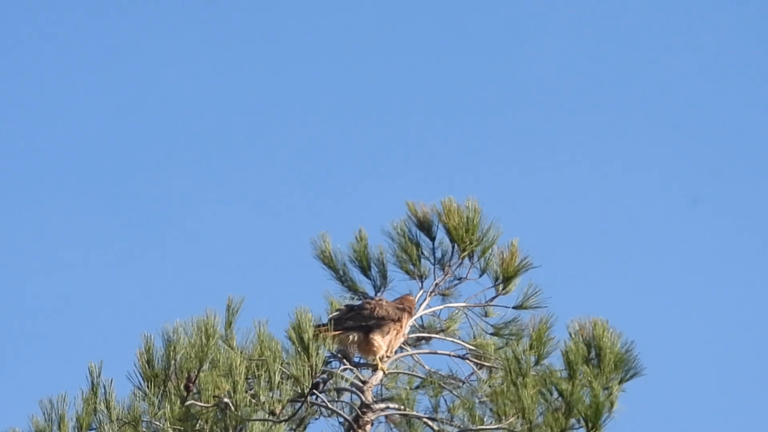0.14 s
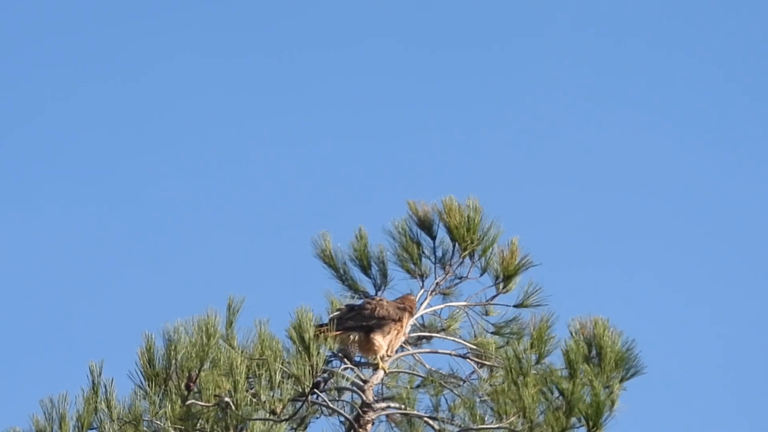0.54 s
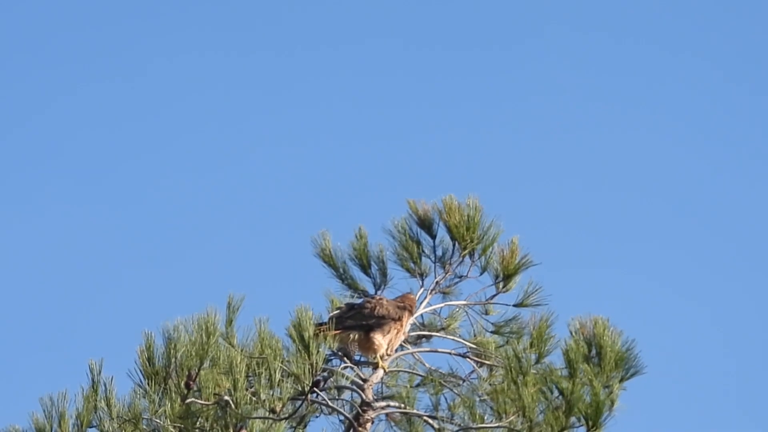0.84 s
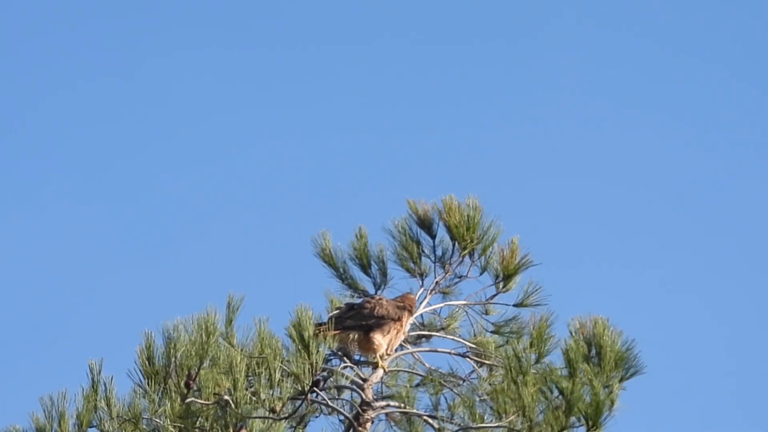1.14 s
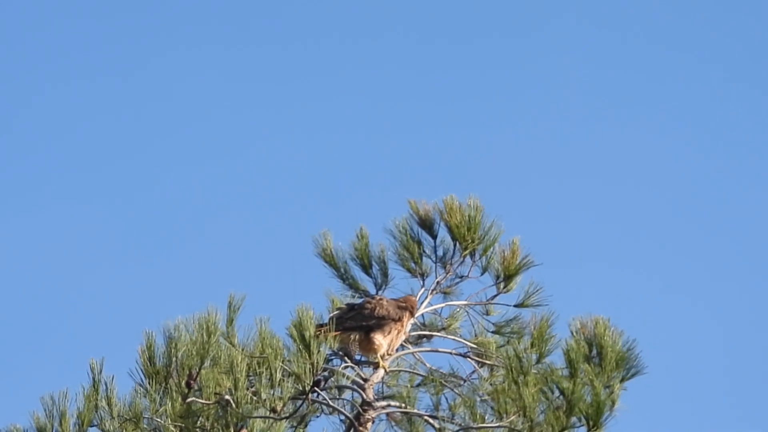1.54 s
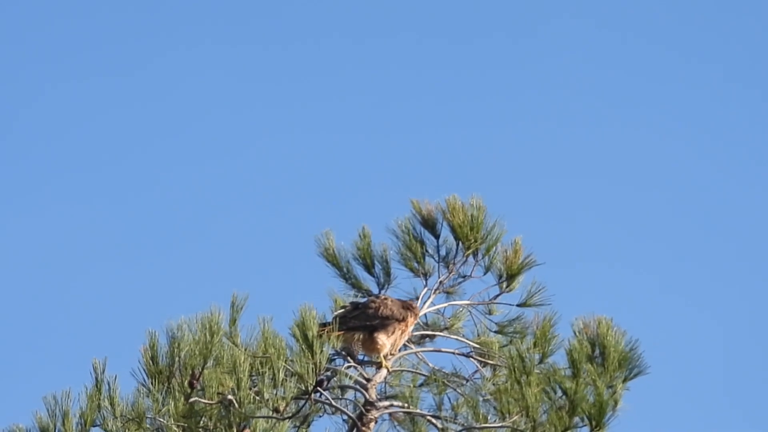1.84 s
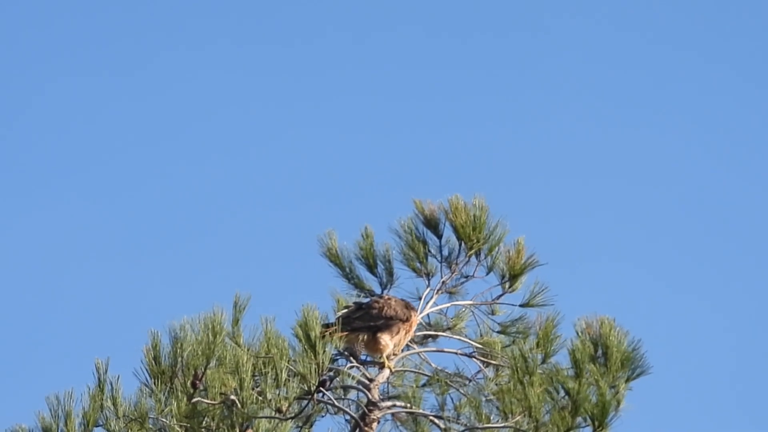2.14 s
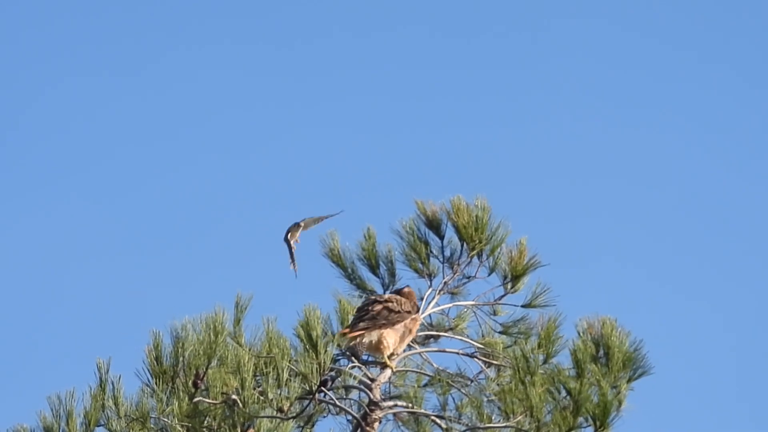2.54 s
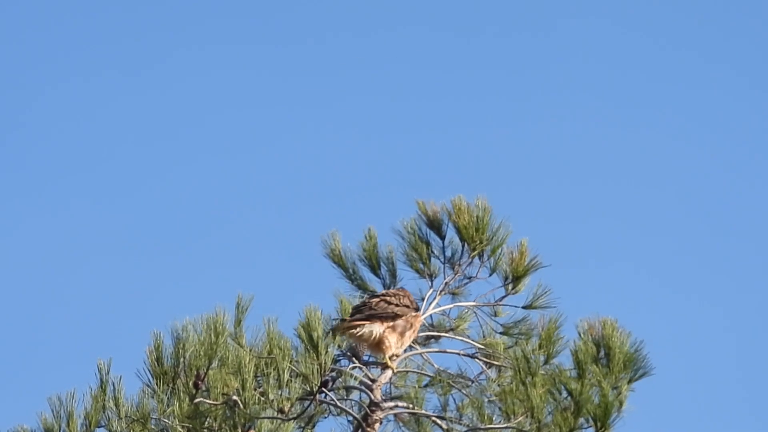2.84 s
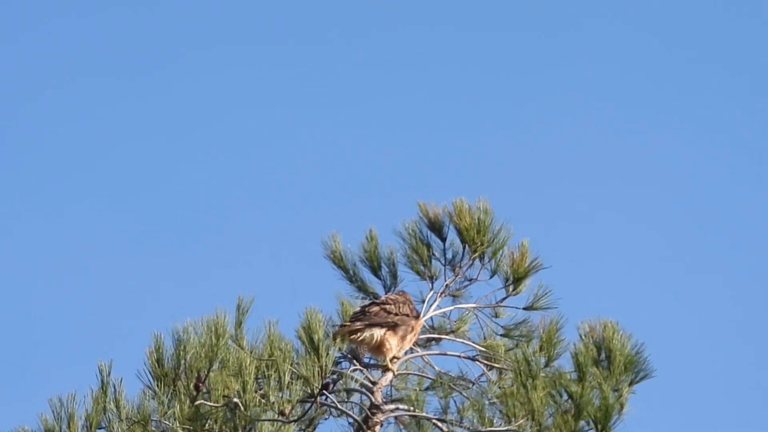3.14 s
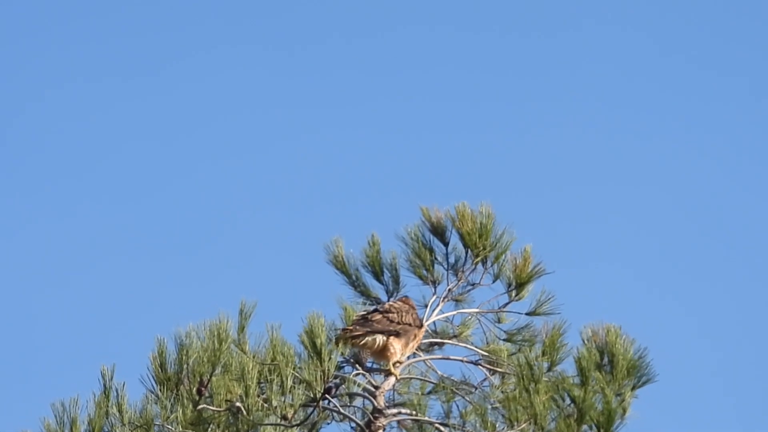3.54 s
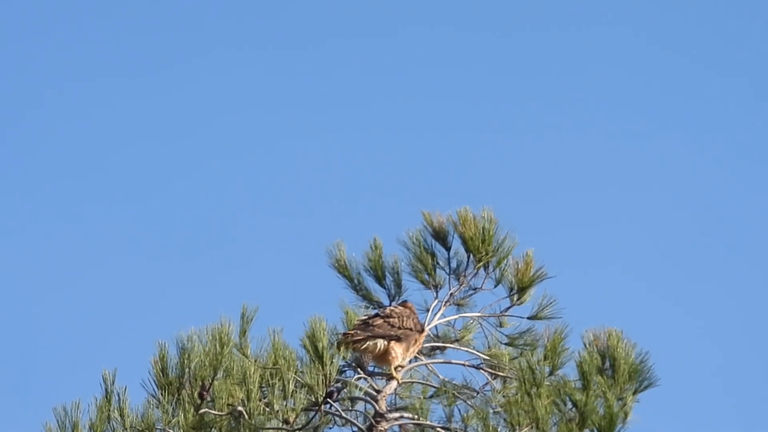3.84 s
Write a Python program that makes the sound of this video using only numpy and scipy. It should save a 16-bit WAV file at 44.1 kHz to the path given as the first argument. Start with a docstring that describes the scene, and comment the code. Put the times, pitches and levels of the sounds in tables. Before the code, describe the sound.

Small falcon gives seven rapid shrill calls over low wind and distant traffic rumble outdoors.

```python
"""Open air by trees: a small falcon gives seven shrill calls over wind and the drone of far traffic.
Its voice is a sum of partials on drawn pitch and level curves, with hoarse breaks with a quick beating.
Before it, other small birds chirp further off, one gives a long rising rasp, and twigs tick:
more partials, torn hiss and dying noise. Trees return a thin echo, a blurred noise tail;
wind and traffic are banded noise with wavering engine tones."""
import sys
import numpy as np
from scipy import signal
from scipy.fft import rfft, irfft
from scipy.io import wavfile
from scipy.ndimage import uniform_filter1d

SR = 44100
rng = np.random.default_rng(int(sys.argv[2]) if len(sys.argv) > 2 else 0)


def materialize(psi):
    """Save the field psi as 16-bit PCM at rate SR to the path in sys.argv[1].

    A 1-D psi becomes a single channel; in a 2-D psi each row is a channel.
    """
    bounded = np.clip(np.atleast_2d(psi).T, -1, 1)
    quanta = np.round(bounded * 32767).astype(np.int16)
    wavfile.write(sys.argv[1], SR, quanta)


N = 176400


def falcon():
    """The 2nd partial leads, the throat sets the others; around a break the level beats quickly."""
    # one table per call, an arched note, mostly then a dip and a jump to a high note:
    # (time [s], pitch [Hz], level of 2nd partial [dB])
    calls = [
        [(2.882, 2240, -29), (2.886, 2330, -21), (2.899, 2490, -17), (2.914, 2470, -14), (2.935, 2250, -28),
         (2.951, 2510, -15), (2.955, 2870, -14), (2.988, 2790, -18.5), (2.992, 2400, -22.5), (2.996, 2150, -22)],
        [(3.062, 2280, -23), (3.067, 2370, -25), (3.075, 2520, -13), (3.078, 2870, -19), (3.092, 2850, -15.5),
         (3.096, 2490, -17.5), (3.114, 2250, -30), (3.125, 2500, -15), (3.129, 2830, -18.5),
         (3.151, 2880, -14.5), (3.164, 2780, -24), (3.168, 2370, -20), (3.172, 2150, -32)],
        [(3.24, 2250, -35), (3.245, 2390, -23), (3.256, 2540, -16.5), (3.265, 2520, -16.5), (3.277, 2300, -27),
         (3.303, 2560, -18.5), (3.307, 2860, -16), (3.335, 2840, -17), (3.339, 2450, -21.5), (3.344, 2150, -22)],
        [(3.419, 2190, -42), (3.424, 2280, -21.5), (3.431, 2390, -21.5), (3.447, 2390, -24.5),
         (3.456, 2250, -28), (3.466, 2310, -22.5), (3.479, 2540, -15), (3.482, 2820, -18), (3.503, 2840, -16.5),
         (3.508, 2400, -20.5), (3.514, 2150, -27)],
        [(3.59, 2200, -27), (3.594, 2290, -22.5), (3.603, 2370, -19.5), (3.618, 2350, -21.5),
         (3.632, 2200, -29), (3.648, 2500, -17.5), (3.652, 2820, -15), (3.675, 2820, -17.5),
         (3.679, 2400, -18.5), (3.684, 2150, -21)],
        [(3.757, 2160, -56), (3.761, 2250, -23.5), (3.772, 2370, -18), (3.784, 2360, -19.5),
         (3.804, 2120, -23.5), (3.814, 2450, -17), (3.823, 3175, -21), (3.831, 2870, -15.5),
         (3.843, 2820, -22.5), (3.847, 2380, -14), (3.853, 2150, -37)],
        [(3.939, 2180, -28), (3.943, 2250, -22), (3.958, 2340, -18), (3.974, 2200, -22.5), (3.982, 2310, -31),
         (4.01, 2710, -7.5)],
    ]
    # dips to a lower, hoarse register that sags and springs back:
    # (time [s], length [s], rim pitch [Hz], lowest pitch [Hz], level [dB])
    breaks = [(2.924, 0.027, 1926, 1670, -32), (3.276, 0.024, 1760, 1562, -32),
              (3.455, 0.0262, 1737, 1504, -30.5), (3.62, 0.028, 1830, 1525, -28),
              (3.977, 0.0203, 1920, 1575, -27.5)]
    # partials of the hoarse register: (multiple of pitch, level [dB])
    break_partials = [(2, -7), (3, 1.5), (4, 2.5)]
    # half-pitch catches at the start of some calls:
    # (time [s], length [s], start pitch [Hz], end pitch [Hz], level [dB])
    catches = [(3.063, 0.012, 1160, 1200, -41), (3.241, 0.013, 1210, 1224, -34.5),
               (3.42, 0.0054, 1130, 1200, -35.5)]
    # partials of a catch: (multiple of pitch, level [dB])
    catch_partials = [(3, -6), (5, 8)]
    call_rough, call_breath_db, break_rough = .09, -56, .12
    beat_hz, beat_lead_s, beat_depth = 176, 0.0061, .8

    out, t = np.zeros((2, N)), np.arange(N) / SR
    call_partials = [(1, None), (2, 0), (3, None), (4, None), (5, None)]  # None: set by the throat
    for call in calls:
        add_voice(out, call, call_partials, call_rough, 250, call_breath_db)
    for start, length, *_ in breaks:
        since = t - start + beat_lead_s
        whole_beats_s = round(length * beat_hz) / beat_hz
        beating = (since > 0) * (since < whole_beats_s)
        dip = np.sin(np.pi * beat_hz * since) ** 2 * beating
        out = out * (1 - beat_depth * dip)
    for row in breaks:
        add_voice(out, scoop(row), break_partials, break_rough, 300)
    for row in catches:
        add_voice(out, swell(row), catch_partials, break_rough, 300)
    return out


def scoop(row):
    """A short sag in pitch that springs back."""
    start, length, rim, low, db = row
    return [(start, rim, db - 14),
            (start + .35 * length, low * 1.03, db - 2),
            (start + .7 * length, low, db),
            (start + length, rim * 1.08, db - 4)]


def swell(row):
    """A short glide that swells and fades."""
    start, length, hz0, hz1, db = row
    return [(start, hz0, db - 12),
            (start + .4 * length, .7 * hz0 + .3 * hz1, db),
            (start + length, hz1, db - 8)]


def small_birds():
    """Chirps are gliding partials; the rasp is overlapping hoarse strands with torn hiss."""
    # far chirps, one table each: (time [s], pitch [Hz], level [dB])
    chirps = [
        [(0.42, 3410, -69), (0.446, 3980, -53), (0.47, 4330, -54.5)],
        [(0.462, 3650, -52), (0.48, 3280, -44), (0.497, 2590, -52)],
        [(0.478, 3390, -48), (0.497, 3760, -39.5), (0.505, 4380, -40), (0.515, 4030, -34.5), (0.532, 3850, -39)],
        [(0.892, 3150, -77), (0.909, 3600, -55), (0.922, 3980, -49), (0.944, 3800, -45.5), (0.955, 4440, -54),
         (0.965, 4460, -68)],
        [(1.275, 2430, -49), (1.288, 2950, -45), (1.3, 3850, -56)],
        [(1.5, 3700, -48), (1.535, 3554, -39), (1.56, 3540, -49)],
        [(1.545, 3810, -26.5), (1.552, 4670, -36.5), (1.562, 4670, -44)],
        [(1.8, 3430, -71), (1.821, 3920, -55.5), (1.85, 5150, -61)],
        [(1.84, 2990, -61), (1.89, 3305, -50)],
        [(2.016, 5440, -61), (2.05, 4680, -67)],
    ]
    # partials of the far chirps: (multiple of pitch, level [dB])
    chirp_partials = [(1, 2.5), (2, -33.5)]
    # one nearer, brighter chirp, two voices at its start: (time [s], pitch [Hz], level [dB])
    near_chirp = [
        [(2.394, 2370, -54), (2.404, 2650, -44), (2.416, 2843, -32), (2.421, 3330, -34.5), (2.428, 3450, -26.5),
         (2.438, 3780, -32.5), (2.46, 4360, -47)],
        [(2.396, 3130, -49), (2.408, 3284, -41), (2.424, 3800, -29.5)],
    ]
    # partials of the nearer chirp: (multiple of pitch, level [dB])
    near_partials = [(1, 2.5), (2, -17.5), (3, -35)]
    # three torn strands of the rasp: (time [s], pitch [Hz], level [dB])
    rasp = [
        [(1.295, 2518, -45), (1.33, 2600, -41), (1.362, 2810, -40), (1.385, 2750, -45)],
        [(1.325, 1745, -54), (1.365, 1971, -42.5), (1.41, 2196, -36), (1.46, 2360, -41), (1.5, 2530, -39)],
        [(1.485, 2847, -44), (1.52, 2910, -34.5), (1.545, 2892, -40.5), (1.575, 2880, -50)],
    ]
    # partials of each strand: (multiple of pitch, level [dB])
    rasp_partials = [
        [(1, -0.5), (3, -4)],
        [(1, -14), (2, 2.5), (3, -6.5), (4, -14)],
        [(1, -5.5), (2, 3), (3, -18)],
    ]
    # relative spectrum of the rasp's hiss: (frequency [Hz], density [dB per Hz])
    rasp_hiss = [(1800, -18.5), (2300, -7.5), (4500, -2.5), (5130, -7.5), (8510, -6), (14500, -71)]
    # course of the hiss: (time [s], level [dB])
    rasp_air = [(1.245, -53), (1.3, -32.5), (1.41, -33.5), (1.465, -41), (1.53, -32), (1.6, -58)]

    out = np.zeros((2, N))
    for chirp in chirps:
        add_voice(out, chirp, chirp_partials, rough=.45, rough_hz=200, breath_db=-22)
    for chirp, partials in zip(near_chirp, [near_partials, near_partials[:1]]):
        add_voice(out, chirp, partials, rough=.2, rough_hz=200, breath_db=-36)
    for strand, partials in zip(rasp, rasp_partials):
        add_voice(out, strand, partials, rough=.55, rough_hz=300)
    s, db = np.transpose(rasp_air)
    level = np.interp(np.arange(N) / SR, s, db, left=-120, right=-120)
    hiss_gain = amp(level + drift(90, N))  # 1 dB of quick flicker
    return out + hiss_gain * banded_noise(rasp_hiss, patchy_db=5)


def ticks():
    """A short crack inside a brief, brighter rustle of needles: two dying bursts of noise."""
    # twig snaps: (time [s], level before the band filter [dB], lowest frequency [Hz])
    snaps = [(0.295, -34, 2200), (1.662, -39, 4500)]
    crack_t60_s, crack_top_hz = .03, 6000
    rustle_t60_s, rustle_db, rustle_rise_s, rustle_top_hz = .25, -12, .025, 9000

    out, t = np.zeros(N), np.arange(SR // 5) / SR
    for s, db, low_hz in snaps:
        crack, rustle = rng.standard_normal((2, len(t)))
        # the crack falls where the rustle has fully risen
        crack = crack * amp(-60 * (t - rustle_rise_s) / crack_t60_s) * (t > rustle_rise_s)
        rustle_rise = np.minimum(t / rustle_rise_s, 1) ** 2
        rustle = rustle * amp(rustle_db - 60 * t / rustle_t60_s) * rustle_rise
        i = int((s - rustle_rise_s) * SR)
        for part, top_hz in [(crack, crack_top_hz), (rustle, rustle_top_hz)]:
            band = signal.butter(3, [low_hz, top_hz], "band", fs=SR, output="sos")
            out[i:i + len(t)] += amp(db) * signal.sosfilt(band, part)
    return out


def trees(x):
    """Diffuse dying echoes, unlike left and right, with a rough, blurred level."""
    t60_s, start_s, cut_hz = .6, 0.0086, 6500
    near_t60_s, near_db = 0.2, 12  # the nearest branches answer first and loudest
    blur, blur_hz = .6, 120  # roughness of the echo's level

    t = np.arange(SR) / SR
    decay = amp(-60 * t / t60_s) + amp(near_db - 60 * t / near_t60_s)
    tail = rng.standard_normal((2, SR)) * decay * (t > start_s)
    tail = signal.sosfilt(signal.butter(1, cut_hz, fs=SR, output="sos"), tail)
    tail = tail / np.sqrt(np.sum(tail ** 2, axis=1, keepdims=True))
    echo = signal.fftconvolve(x.mean(0)[None], tail, axes=1)[:, :N]
    return echo * (1 + blur * np.array([drift(blur_hz, N), drift(blur_hz, N)]))


def traffic_and_wind():
    """Broad noise on a slow level, with wavering engine tones."""
    # relative spectrum of wind and traffic: (frequency [Hz], density [dB per Hz])
    wind = [(30, -69), (91, -31), (114, -16.5), (201, -6.5), (247, -10.5), (328, -3), (548, -9), (709, -4),
            (1610, -11.5), (2560, -27.5), (4880, -25), (14000, -62)]
    # slow course of the noise: (time [s], level [dB])
    gust = [(0.0, -43.5), (2.56, -42), (4.0, -46)]
    # far engines, one table each: (time [s], frequency before the 0.99 multiple below [Hz], level [dB])
    drones = [
        [(0, 697.6, -51.5), (0.45, 691, -60.5)],
        [(1.7, 310, -62), (2.2, 318, -49), (2.8, 310, -55), (3.4, 314, -51.5), (4, 316, -50)],
    ]

    s, db = np.transpose(gust)
    noise = amp(np.interp(np.arange(N) / SR, s, db)) * banded_noise(wind, patchy_db=3.0)
    tones = np.zeros((2, N))
    for tone in drones:
        add_voice(tones, tone, [(0.99, 0.029)], rough=0.72, rough_hz=8.0)
    return noise + tones.mean(0)  # the engines sit in the middle


def add_voice(out, rows, partials, rough, rough_hz, breath_db=-60):
    """Partials on a pitch and level curve, roughened by random flutter and by breath noise."""
    # throat colour against the 2nd partial, at full effort: (frequency [Hz], level [dB])
    throat = [(2300, -15.5), (2900, -19.5), (7000, -7.5), (7600, -14), (8600, -18.5), (9500, -11),
              (10300, -31.5), (11400, -36.5), (14500, -69)]
    # side of the voice: (frequency [Hz], left minus right [dB])
    voice_pan = [(2500, 5.5), (4800, -1), (5700, -0.5), (9000, 1.5)]
    left_lead_s = 2.4e-5
    bright_per_db, full_db = .9, -14  # throat-set partials fade further when the effort drops
    glide_loss_db = .12  # they also fade on fast glides, except the 2nd [dB per Hz/ms]

    s, hz, db = np.transpose(rows)
    i = np.arange(int(s[0] * SR), min(int(s[-1] * SR), N))
    pitch = np.interp(i / SR, s, hz)
    level = np.interp(i / SR, s, db) + 3  # rms to peak of a sine
    turn = 2 * np.pi * np.cumsum(pitch) / SR + rough * drift(rough_hz, len(i))
    fade = np.clip(np.minimum(i - i[0], s[-1] * SR - i) / 60, 0, 1)  # 60 samples at each end
    flutter = 1 + rough * drift(rough_hz, len(i))
    breath = amp(breath_db) * drift(1200, len(i))
    glide = uniform_filter1d(np.abs(np.gradient(pitch)) * SR / 1000, size=200)  # Hz/ms
    sides = np.array([[.5], [-.5]])
    for k, k_db in partials:
        if k_db is None:
            effort_db = bright_per_db * (level - full_db)
            k_db = at_hz(throat, k * pitch) + effort_db - glide_loss_db * glide * (k != 2)
        pan = at_hz(voice_pan, k * pitch) * sides
        lead = 2 * np.pi * k * pitch * left_lead_s * sides
        wave = np.sin(k * turn + lead + rng.uniform(0, 2 * np.pi))
        rough_gain = flutter + breath * k ** 4  # breath blurs the higher partials most
        out[:, i] += amp(level + k_db + pan) * fade * rough_gain * wave


def banded_noise(spectrum, patchy_db):
    """Third-octave bands of stereo noise, each with its own level, flicker, likeness and side; rms 1."""
    # likeness of left and right: (frequency [Hz], correlation [-1 to 1])
    likeness = [(60, 0.99), (150, 0.99), (370, 0.89), (930, 0.87), (2310, 0.56), (5770, -0.19)]
    # side of the noise: (frequency [Hz], left minus right [dB])
    noise_pan = [(300, 0.5), (900, -2), (2500, 0.5)]

    out, edges = 0, 28 * 2 ** (np.arange(28) / 3)
    white = rng.standard_normal((2, 2, N))
    for k, (low, high) in enumerate(zip(edges, edges[1:])):
        band = signal.butter(3, [low, high], "band", fs=SR, output="sos")
        mid, side = signal.sosfilt(band, white[k % 2])  # neighbouring bands use different noise
        hz = np.sqrt(low * high)
        alike = np.clip(at_hz(likeness, hz), -1, 1)
        slow = np.repeat(drift(150, N // 40 + 1), 40)[:N]  # held 40 samples: a 3.75 Hz flicker
        pan = at_hz(noise_pan, hz) * np.array([[.5], [-.5]])
        gain = amp(at_hz(spectrum, hz) + patchy_db * slow + pan)
        out = out + gain * (np.sqrt(1 + alike) * mid + np.sqrt(1 - alike) * side * [[1], [-1]])
    return rms_one(out)


def drift(rate, size):
    """Smooth random wander of rms 1: white noise through two equal low-pass poles at rate [Hz]."""
    r = np.exp(-2 * np.pi * rate / SR)
    run = SR // 2  # let the filter settle
    wander = signal.lfilter([1], [1, -2 * r, r * r], rng.standard_normal(size + run))
    return rms_one(wander[run:])


def at_hz(points, hz):
    """Reads a curve of (frequency, value) points, straight on a log frequency scale."""
    points = np.array(points)
    return np.interp(np.log(hz), np.log(points[:, 0]), points[:, 1])


def amp(db):
    """Amplitude factor of a level in dB."""
    return 10 ** (np.asarray(db) / 20)


def rms_one(x):
    """Scales a signal to rms 1."""
    return x / np.sqrt(np.mean(x ** 2) + 1e-20)


def scene():
    """Falcon, further birds and twigs, all kept free of lows, their tree echo, and the background."""
    trees_db, far_trees_db = -9, -8.5  # echo send of the falcon and of the rest
    clear = signal.butter(4, 1500, "high", fs=SR, output="sos")
    near = signal.sosfilt(clear, falcon())
    far = signal.sosfilt(clear, small_birds() + ticks())
    echo = trees(amp(trees_db) * near + amp(far_trees_db) * far)
    return near + far + echo + traffic_and_wind()


def record(dry):
    """The treble arrives a little after the rest; the top is cut."""
    split_hz, treble_lag_s, cutoff_hz = 4000, .011, 15050
    edge = SR // 8  # mirrored margin, so the delay does not wrap round
    size = N + 2 * edge
    hz = np.arange(size // 2 + 1) * SR / size
    lag = np.where(hz > split_hz, treble_lag_s, 0)
    spectrum = rfft(np.pad(dry, ((0, 0), (edge, edge)), "reflect"))
    out = irfft(spectrum * np.exp(-2j * np.pi * hz * lag), size)[:, edge:-edge]
    return signal.sosfilt(signal.cheby2(24, 70, cutoff_hz, fs=SR, output="sos"), out)


dry = scene()
out = record(dry)
materialize(out)
```